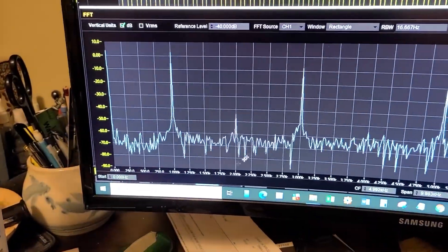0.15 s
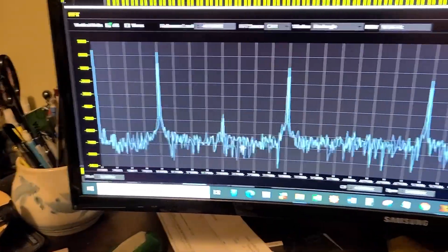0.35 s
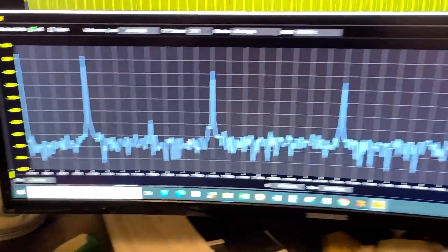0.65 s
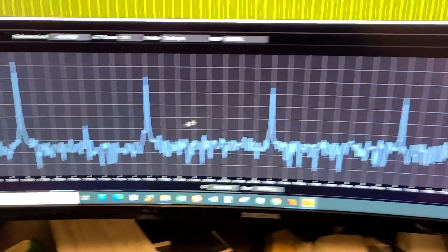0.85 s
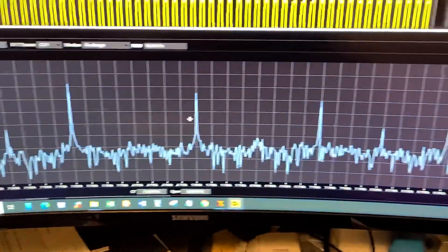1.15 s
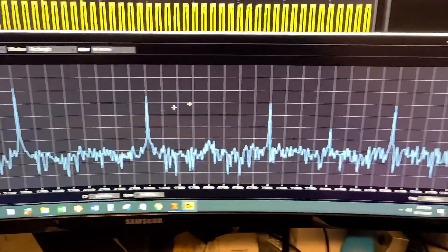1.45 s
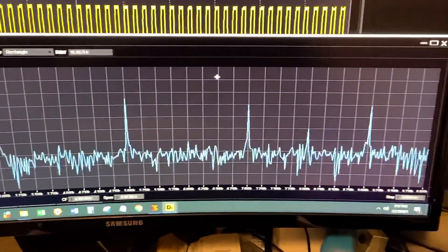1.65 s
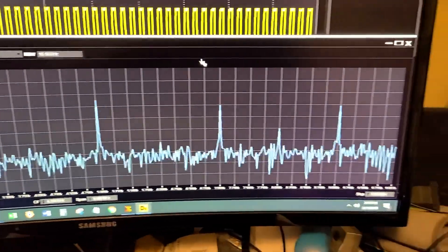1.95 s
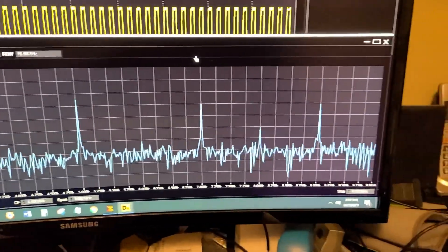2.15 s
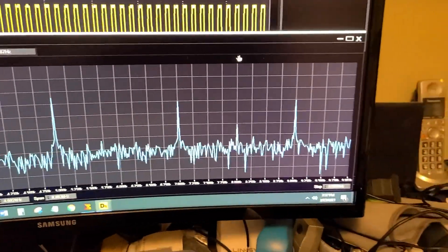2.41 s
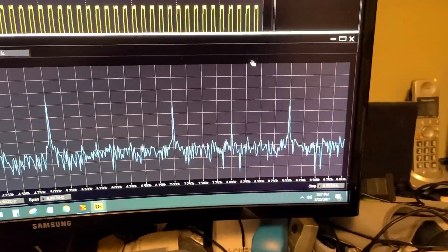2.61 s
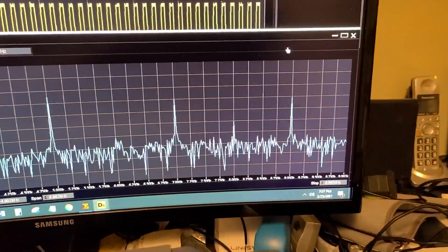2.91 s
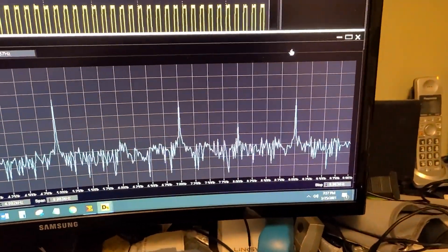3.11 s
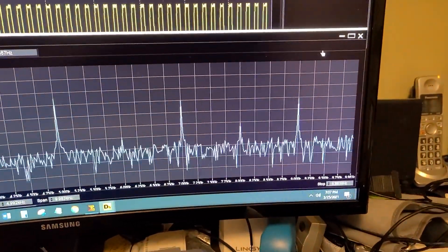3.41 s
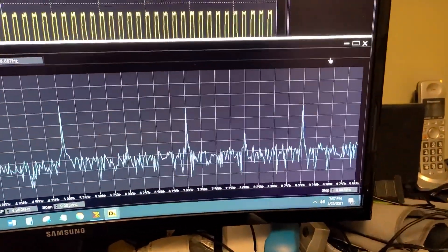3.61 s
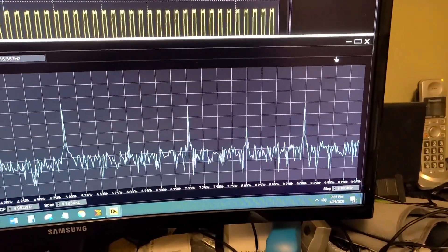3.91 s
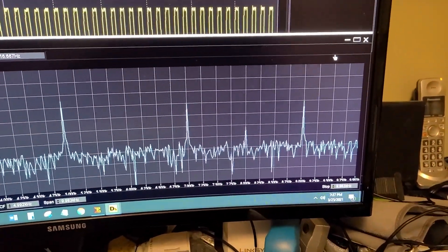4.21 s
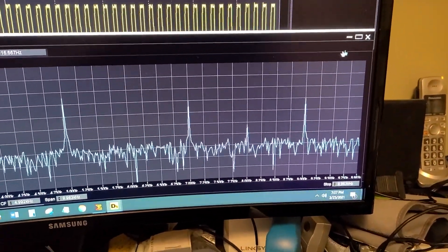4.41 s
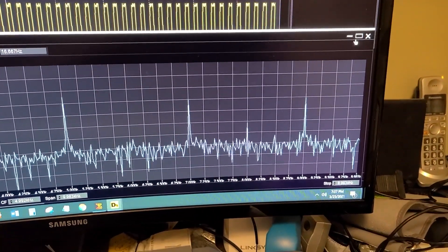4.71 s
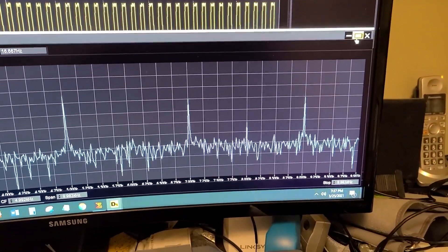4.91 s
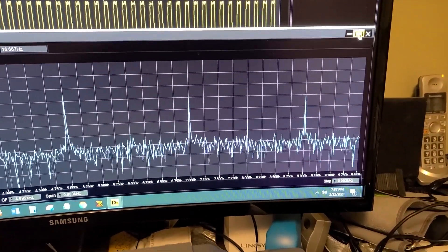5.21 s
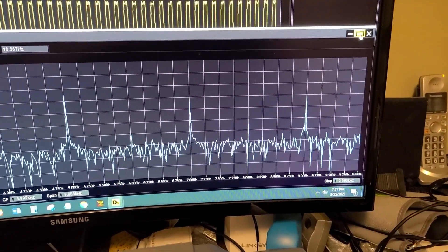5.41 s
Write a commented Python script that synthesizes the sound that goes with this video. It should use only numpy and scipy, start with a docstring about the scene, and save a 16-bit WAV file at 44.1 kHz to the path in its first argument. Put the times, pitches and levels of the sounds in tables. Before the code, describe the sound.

A computer fan hums steadily while a mouse knocks onto a wooden desk several times, skids briefly, and is finally clicked once.

```python
"""A computer fan hums and hisses throughout: shaft-locked tones over air noise, both shifting in level and side
as a hand-held phone turns past it. From 0.3 to 3.1 s a computer mouse is set down on a wooden desk a few times:
contact chatter rings its shell and cover, over base, buttons and desk. At 1.3 s its feet skid: grainy noise.
A finger touches the button with a faint tick at 5.06 s, then two snaps as it is pressed and let go: all ring
one set of modes, each with one rebound. A small room adds scatter and a late tail to landings, tick and snaps."""
import sys
import numpy as np
from scipy import signal
from scipy.fft import rfft, irfft, next_fast_len
from scipy.io import wavfile
from scipy.ndimage import uniform_filter1d

SR = 44100
rng = np.random.default_rng(int(sys.argv[2]) if len(sys.argv) > 2 else 0)


def unload_wav(signal):
    """Save mono or channel-first audio to the path in sys.argv[1] as 16-bit WAV at rate SR, clipped to [-1, 1]."""
    wavfile.write(
        sys.argv[1],
        SR,
        np.round(np.clip(np.atleast_2d(signal).T, -1, 1) * 32767).astype(np.int16),
    )


N = 244755


def undb(db):
    """Decibels to amplitude ratio."""
    return 10 ** (np.asarray(db) / 20)


def along(hz, points_hz, values):
    """Interpolate values on a logarithmic frequency axis."""
    return np.interp(np.log(np.maximum(hz, 1)), np.log(points_hz), values)


def coloured(db_per_hz, size, channels=1):
    """Gaussian noise with the given level per Hz at each frequency bin."""
    white = rfft(rng.standard_normal((channels, size)))
    return irfft(white * undb(db_per_hz) * np.sqrt(SR / 2), size)


def walk(rate_hz):
    """Random levels held 1 / rate_hz and smoothed by two moving averages of that length."""
    hold = int(SR / rate_hz)
    steps = np.repeat(rng.standard_normal(N // hold + 1), hold)
    return 0.99 * uniform_filter1d(uniform_filter1d(steps, hold), hold)[:N]


def add(out, start_s, sound):
    """Mix a sound into out at start_s, cut at the end."""
    i = int(start_s * SR)
    out[i:i + len(sound)] += sound[:len(out) - i]


def pan(left_minus_right_db):
    """Gains of left and right, split evenly about 0 dB."""
    return undb(np.array([[.5], [-.5]]) * left_minus_right_db)


def ring(modes, rise_ms):
    """Struck part: decaying sines under a push that builds up; each blow varies mode levels and pitches."""
    detune = .015  # relative standard deviation
    t = np.arange(SR // 3) / SR
    hz, db, t60_s = (c[:, None] for c in np.transpose(modes))
    gain = undb(db + 1.5 * rng.standard_normal(db.shape))
    gain[1::2] *= -1  # neighbouring modes start in opposite directions
    hz = hz * (1 + detune * rng.standard_normal(db.shape))
    decay = np.exp(-np.log(1000) * t / np.maximum(t60_s, 1e-3))
    ringing = np.sum(gain * decay * np.sin(2 * np.pi * hz * t), axis=0)
    return ringing * (1 - np.exp(-t * 1000 / rise_ms))


def landings():
    """Contact chatter excites shell and cover; base, buttons and desk ring from single pushes; seams crackle."""
    # mouse on desk: t/s, desk thump/dB, base knock/dB, cover clack/dB, crackle/dB, contact softness [0-1]
    touches = [(0.328, -48.5, -72, -75, -85, .3), (0.484, -47.5, -49.5, -62, -72, 1),
               (1.107, -44, -40.5, -43, -53, 0.08), (1.116, -45.5, -56, -54, -48.5, .4),
               (1.233, -36.5, -28.5, -36.5, -39, 0.04), (1.242, -34, -56, -53, -62, 0.5),
               (2.043, -43, -34, -34.5, -46, 0.16), (2.053, -53, -37, -61, -55, .9),
               (2.063, -35, -27.5, -51, -47, 0.9), (2.072, -54, -39.5, -47.5, -51.5, 0.3),
               (3.039, -48, -48.5, -61, -68, 0.24), (3.098, -37, -31.5, -63, -59, 0.69),
               (3.103, -44.5, -44.5, -50, -56, 0.3)]
    # modes of desk top, base, shell, cover, buttons: f/Hz, level/dB, t60/s
    desk_modes = [(110.3, -9.5, 0.26), (232, 5.5, 0.12), (330, 3, 0.095)]
    base_modes = [(402, -10, 0.042), (480, -6, 0.069), (541, -2, 0.058), (594, -1, 0.057), (716, -10, 0.11),
                  (773, -9.5, 0.086), (853, -4.5, 0.074)]
    shell_modes = [(1042, -1.5, 0.047), (1120, 3, 0.022), (1255, 5, 0.024), (1470, 2, 0.021),
                   (1685, 4, 0.0082)]
    cover_modes = [(1890, 0.5, 0.012), (1970, 2, 0.013), (2154, 1.5, 0.0096), (2254, -1.5, 0.011),
                   (2560, 3, 0.01), (2720, -2, 0.012), (3040, -6.5, 0.013)]
    button_modes = [(4250, 3, 0.0071), (5000, 0, 0.015), (7350, -24, 0.0065), (11500, -11, 0.0036)]
    # spectrum of loose seams: f/Hz, relative level/dB
    crackle_spectrum = [(800, -7), (2000, 11.5), (4000, -2), (7500, 2), (9000, -13.5), (15500, -22)]
    # each pair: hard, soft contact
    shell_re_base_db, button_re_cover_db, chatter_decay_ms = (-1.5, -15), (-0.5, -28), (2.9, 5.9)
    mouse_room_db, base_room_db, button_room_db, mouse_pan_db = -0.5, -3.5, -15, -2.5

    mouse, base, buttons, desk = np.zeros((4, N))
    size = SR // 20
    t_ms = np.arange(size) / SR * 1000
    crackle_colour_db = along(np.fft.rfftfreq(size, 1 / SR), *np.transpose(crackle_spectrum))
    for s, desk_db, base_db, cover_db, crackle_db, soft in touches:
        shell_db = base_db + np.interp(soft, (0, 1), shell_re_base_db)
        button_db = cover_db + np.interp(soft, (0, 1), button_re_cover_db)
        fade = np.exp(-t_ms / np.interp(soft, (0, 1), chatter_decay_ms))

        chatter = 0.071 * rng.standard_normal(size) * fade
        chatter[0] = -4.5  # the first touch is the hardest
        chatter /= np.sqrt(np.sum(chatter ** 2))
        body = undb(shell_db) * ring(shell_modes, 0.17)
        body += undb(cover_db) * ring(cover_modes, 0.17)
        add(mouse, s, signal.fftconvolve(chatter, body))

        # seams crackle with the decay of the chatter
        crackle = coloured(crackle_colour_db, size)[0]
        crackle_shape = fade * np.minimum(t_ms / 0.85, 1)
        add(mouse, s, undb(crackle_db) * crackle / crackle.std() * crackle_shape)

        add(buttons, s + 0.0015, undb(button_db) * ring(button_modes, 0.31))  # they jump a moment later
        add(base, s, undb(base_db) * ring(base_modes, 0.21))
        add(desk, s, undb(desk_db) * ring(desk_modes, 4.0))
    out = room(mouse, mouse_room_db) * pan(mouse_pan_db)
    out += room(base, base_room_db)
    out += room(buttons, button_room_db)
    return out + desk


def tick_and_snaps():
    """A finger's touch tick, then switch snaps: each rings the modes and once more, reversed, on a rebound."""
    # touch tick, then switch snaps: t/s, level/dB, gain above 9 kHz/dB, gain below 4 kHz/dB, rebound re first/dB
    button_events = [(5.056, -58.5, 3, 13.5, 1), (5.2888, -43, 2, 1.2, 10), (5.4443, -38.5, -8, -1, 7)]
    # modes rung by tick and snaps: f/Hz, level/dB, t60/s
    click_modes = [(720, -15.5, 0.015), (1410, -11, 0.019), (2000, -17.5, 0.007), (2520, -16, 0.0046),
                   (3400, -19, 0.0051), (4380, -7.5, 0.0045), (5500, 1, 0.0058), (6000, -6, 0.0035),
                   (6130, 3.5, 0.0041), (6840, 5, 0.0092), (8600, -10, 0.0059), (10400, -1.5, 0.0023),
                   (11800, -12, .003), (14900, -6, .003)]
    rebound_ms, room_db, pan_db = .76, -7.5, -0.5
    out = np.zeros(N)
    for s, db, treble_db, body_db, rebound_db in button_events:
        modes = [(hz, mode_db + treble_db * (hz > 9000) + body_db * (hz < 4000), t60_s)
                 for hz, mode_db, t60_s in click_modes]
        add(out, s, undb(db) * ring(modes, 0.24))
        add(out, s + rebound_ms / 1000, -undb(db + rebound_db) * ring(modes, 0.11))
    return room(out, room_db) * pan(pan_db)


def skids():
    """Grainy friction of feet on desk, dying away as the mouse slows; independent noise left and right."""
    # feet skidding: t/s, level/dB, rise/s, hold/s, t60/s
    slides = [(1.333, -40, 0.0048, 0.025, 0.25)]
    # friction spectrum: f/Hz, relative level/dB
    friction_spectrum = [(150, -50), (300, -3), (600, -2.5), (1500, 6), (2200, 3), (3500, -7),
                         (5000, -13.5), (7000, -10), (10000, -24.5), (15000, -31)]
    pan_db = -3
    out, size = np.zeros((2, N)), SR // 2
    t = np.arange(size) / SR
    colour_db = along(np.fft.rfftfreq(size, 1 / SR), *np.transpose(friction_spectrum))
    for s, db, rise_s, hold_s, t60_s in slides:
        rub = coloured(colour_db, size, channels=2)
        grain = undb(3.0 * walk(700)[:size] + 1.5 * walk(90)[:size])
        shape = np.minimum(t / rise_s, 1) * undb(-60 * np.maximum(t - hold_s, 0) / t60_s)
        sides = rub / rub.std() * grain * shape * undb(db) * pan(pan_db)
        for line, side in zip(out, sides):
            add(line, s, side)
    return out


def fan():
    """Tones on multiples of a slightly wandering shaft speed over air noise; levels shift as the phone turns."""
    # fan as the phone turns: t/s, level/dB (used re its mean), left minus right/dB
    turning = [(0.0, -52.5, -2), (0.66, -51, -0.5), (0.85, -54.5, -0.5), (1.08, -56, 1), (1.3, -52, 2),
               (1.5, -54, 2), (1.68, -58, 1.5), (1.99, -60, 3.5), (2.32, -58.5, 4), (2.6, -61.5, 4),
               (3.23, -58.5, 3), (3.91, -57.5, 3), (4.39, -60, 3), (4.68, -59, 3), (5.55, -58, 3)]
    # tones: multiple of shaft speed, left level/dB, right level/dB, left phase lead/rad, share of swell
    orders = [(7, -55.5, -57, -0.46, 0.89), (8, -67, -70.5, -0.25, 0.92), (9, -72.5, -70.5, -0.23, 0.41),
              (11, -79, -71.5, -0.25, .1), (12, -83, -78.5, 0.5, 0.034), (16, -74, -69.5, -1.4, 0.18),
              (20, -95.5, -86.5, 6.5, 0.73), (21, -85, -91, 0, 0.96), (24, -79, -86.5, 2.4, 0.78)]
    # air noise: f/Hz, level per Hz/dB, likeness of left and right [0-1]
    air_spectrum = [(20.3, -105, 0), (61.6, -88, 0.8), (72.5, -90, 1), (115.4, -85, 0.87), (141, -100, 1),
                    (196, -93, 0.86), (284, -87, 0.96), (423, -80.5, 1), (511, -90.5, 0.9),
                    (696, -101, 0.84), (1573, -104, 0), (2070, -112, 0), (3100, -111, 0.1),
                    (4950, -124, 0.2), (16100, -124, 0)]
    # air bands straight from the fan: from f/Hz, to f/Hz, share of swell, share of pan
    direct_bands = [(258, 570, 0.5, 0.73), (654, 880, 0.58, 0.79), (1090, 1650, 0.65, 0.17)]
    shaft_hz = 53.64
    lead_ms_per_db = 0.08  # the left port hears the fan earlier as it turns towards it

    s, level_db, pan_db = np.transpose(turning)
    t = np.arange(N) / SR
    swell_db = np.interp(t, s, level_db - np.mean(level_db))
    pan_db = np.interp(t, s, pan_db)
    sides_db = np.outer([.5, -.5], pan_db)

    shaft_phase = 2 * np.pi * np.cumsum(shaft_hz * (1 + 0.00048 * walk(3.1))) / SR
    out = np.zeros((2, N))
    for multiple, left_db, right_db, lead_rad, share in orders:
        turning_lead = 2 * np.pi * multiple * shaft_hz * lead_ms_per_db / 1000 * pan_db
        phase = multiple * shaft_phase + rng.uniform(0, 2 * np.pi)
        phase = phase + np.outer([1, 0], lead_rad + turning_lead)
        waver_db = 1.52 * walk(4.38)
        tone_db = np.array([[left_db], [right_db]]) + share * swell_db + sides_db + waver_db
        out += np.sqrt(2) * undb(tone_db) * np.sin(phase)

    size = next_fast_len(N)
    hz = np.fft.rfftfreq(size, 1 / SR)
    points_hz, air_db, alike = np.transpose(air_spectrum)
    mid, side = rfft(coloured(along(hz, points_hz, air_db), size, channels=2))
    alike = np.clip(along(hz, points_hz, alike), 0, 1)
    air = np.sqrt((1 + alike) / 2) * mid + np.outer([1, -1], np.sqrt((1 - alike) / 2) * side)
    out += irfft(air, size)[:, :N]
    for lo_hz, hi_hz, share, pan_share in direct_bands:
        band = irfft(air * ((hz >= lo_hz) & (hz < hi_hz)), size)[:, :N]
        out += band * (undb(share * swell_db + pan_share * sides_db) - 1)  # steady part is already in
    return out


def room(dry, wet_db):
    """Direct sound, a little earlier on the left, then scatter and a late tail, alike on both sides in the bass."""
    # reverberation: f/Hz, quick scatter off desk and clutter/dB, late tail/dB, late t60/s
    reflections = [(292, -15.5, -4, 0.39), (780, -10.5, -11, 0.27), (2020, 2.5, -3, 0.21),
                   (5000, -6, -8, 0.28), (11900, 2, -8, 0.22)]
    scatter_t60_s, left_lead_ms = 0.029, 0.18
    size = SR // 2
    t, hz = np.arange(size) / SR, np.fft.rfftfreq(size, 1 / SR)
    tail = np.zeros((2, size))
    points_hz, *columns = np.transpose(reflections)
    for centre_hz in 100 * 2 ** np.arange(0, 7.5, .5):
        bell_db = -60 * np.log2(np.maximum(hz, 1) / centre_hz) ** 2
        band = coloured(bell_db, size, channels=2)
        alike = np.clip(1 - centre_hz / 900, 0, 1)
        band[1] = alike * band[0] + np.sqrt(1 - alike ** 2) * band[1]
        scatter_db, late_db, late_t60_s = (along(centre_hz, points_hz, c) for c in columns)
        fade = 0
        for db, t60_s in ((scatter_db, scatter_t60_s), (late_db, late_t60_s)):
            # each part is scaled to its whole energy
            fade = fade + undb(db - 60 * t / t60_s) * np.sqrt(6 * np.log(10) / t60_s)
        tail += band * fade
    response = tail * np.minimum(t / 0.0027, 1) * undb(wet_db) * 2 / SR
    response[0, 0] += 1
    response[1, int(left_lead_ms * SR / 1000)] += 1
    return signal.fftconvolve(dry[None], response, axes=1)[:, :N]


def scene():
    """Sum of mouse and fan."""
    return landings() + tick_and_snaps() + skids() + fan()


def record(dry):
    """Each microphone port colours its side (causal filter from the cepstrum of its gain); the top is cut."""
    # two microphone ports: f/Hz, left gain/dB, right gain/dB
    ports = [(296, 0, 1), (1410, 2, -1), (4700, 3.5, -2.5), (5840, 1.5, -4), (7000, 0.5, -19),
             (7970, 1, -6.5), (8560, -6, -10.5), (10440, 4.5, -4), (12600, -1.5, 2), (15000, 0, 1)]
    # left capsule noise, peaking at its port resonance: f/Hz, level per Hz/dB
    left_hiss = [(5000, -135), (5800, -113), (6750, -100), (7800, -114), (8500, -140)]
    top_hz = 15700
    points_hz, *sides_db = np.transpose(ports)
    hz = np.fft.rfftfreq(1024, 1 / SR)
    cepstrum = irfft(np.log([undb(along(hz, points_hz, db)) for db in sides_db]))
    cepstrum[:, 1:512] *= 2  # fold onto positive time: minimum phase
    cepstrum[:, 513:] = 0
    port_responses = irfft(np.exp(rfft(cepstrum)))
    heard = signal.fftconvolve(dry, port_responses, axes=1)[:, :N]
    size = next_fast_len(N)
    hiss_db = along(np.fft.rfftfreq(size, 1 / SR), *np.transpose(left_hiss))
    heard[0] += coloured(hiss_db, size)[0, :N]
    return signal.sosfilt(signal.ellip(10, .2, 80, top_hz, fs=SR, output="sos"), heard)


dry = scene()
out = record(dry)
unload_wav(out)
```